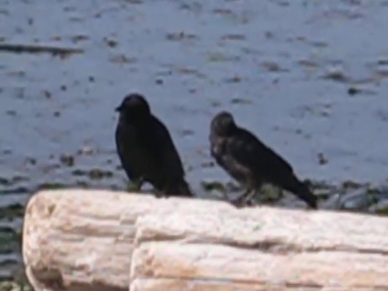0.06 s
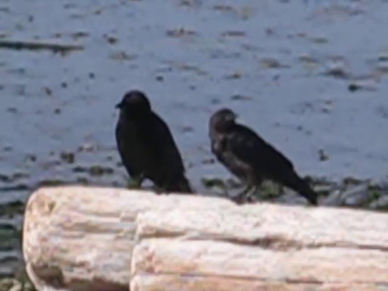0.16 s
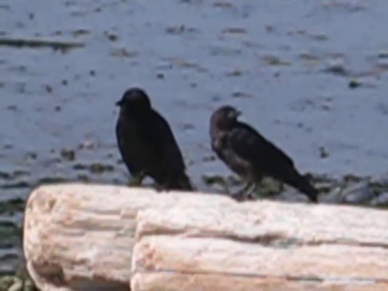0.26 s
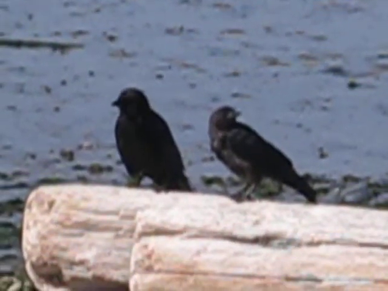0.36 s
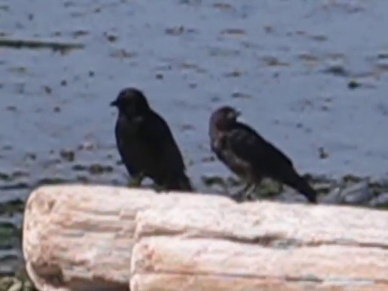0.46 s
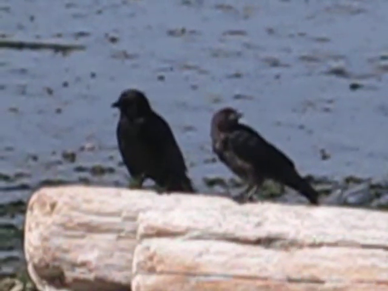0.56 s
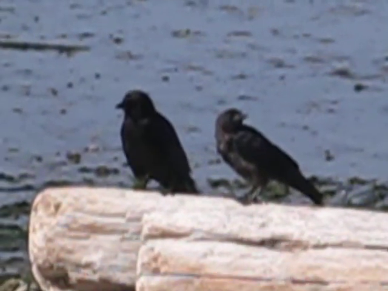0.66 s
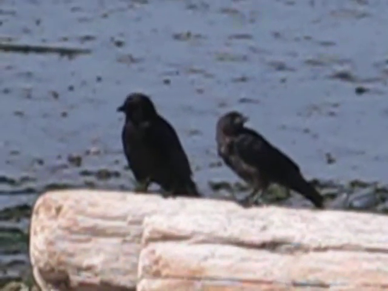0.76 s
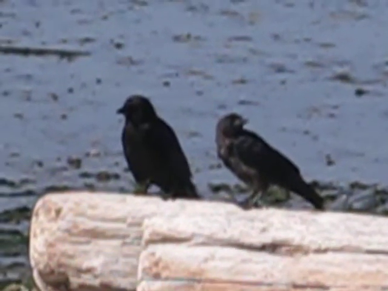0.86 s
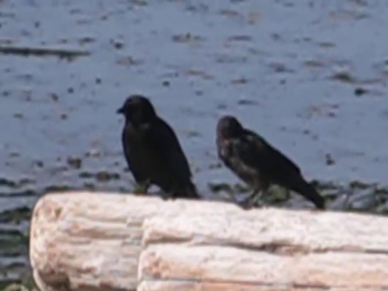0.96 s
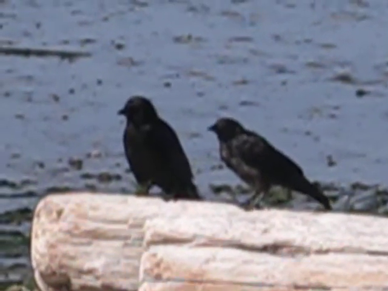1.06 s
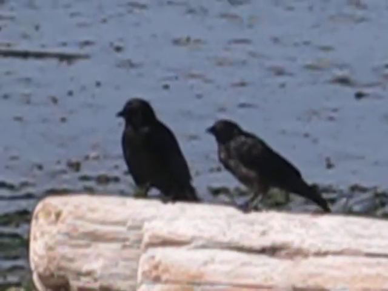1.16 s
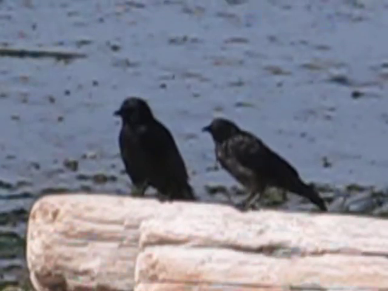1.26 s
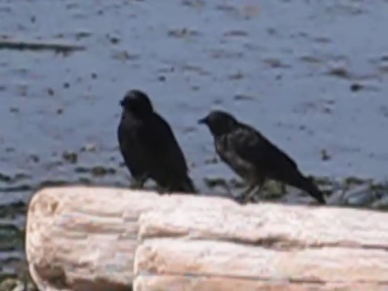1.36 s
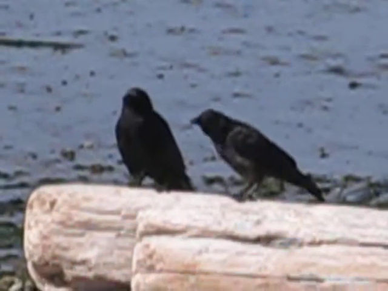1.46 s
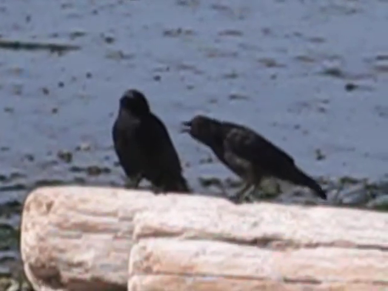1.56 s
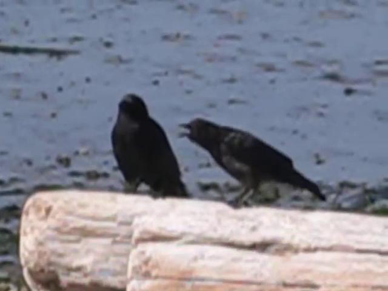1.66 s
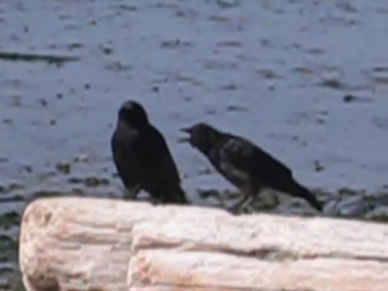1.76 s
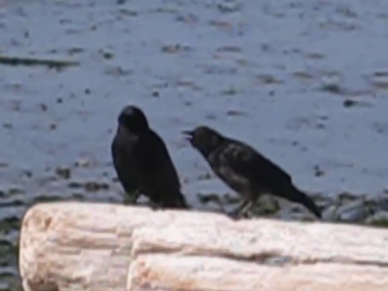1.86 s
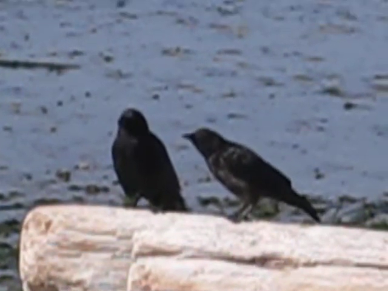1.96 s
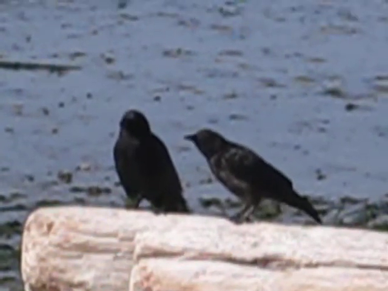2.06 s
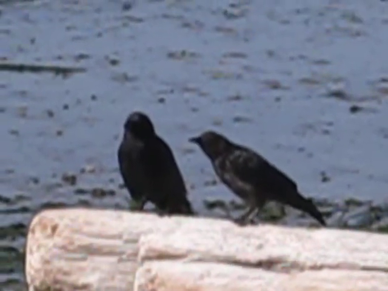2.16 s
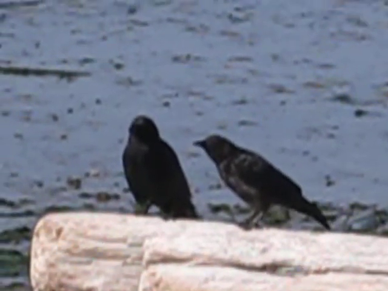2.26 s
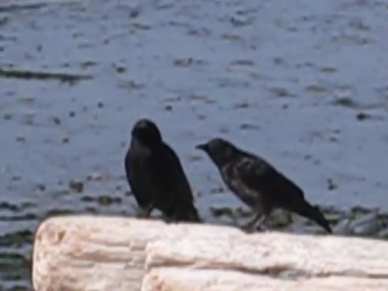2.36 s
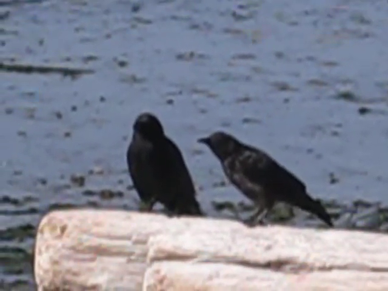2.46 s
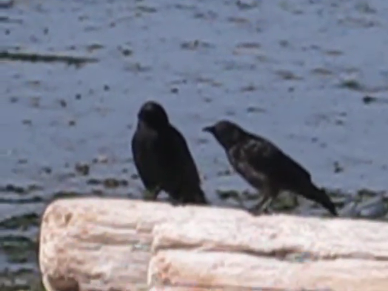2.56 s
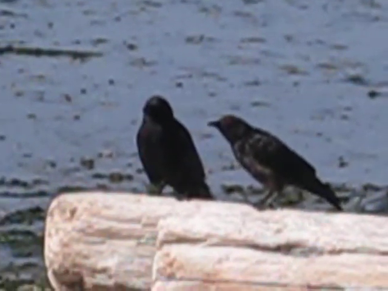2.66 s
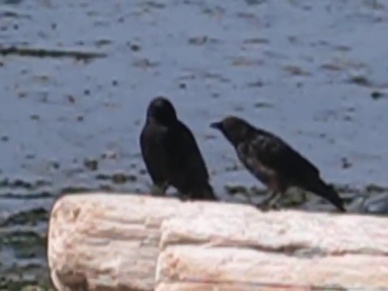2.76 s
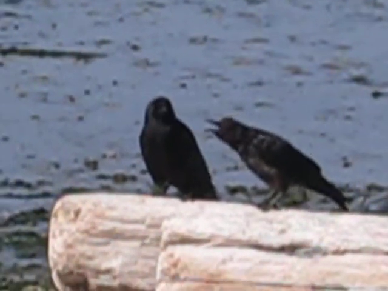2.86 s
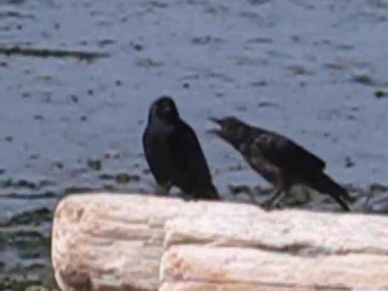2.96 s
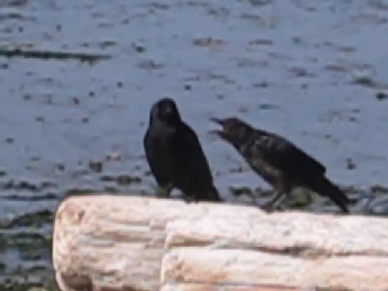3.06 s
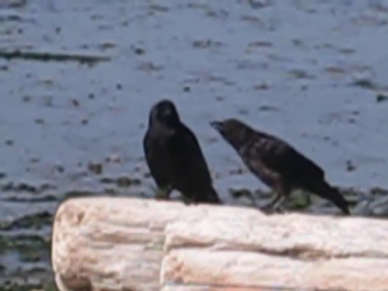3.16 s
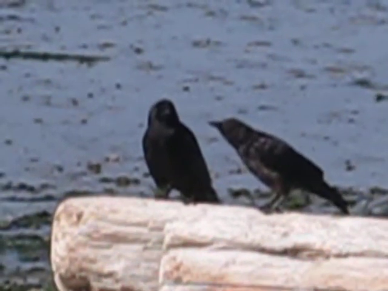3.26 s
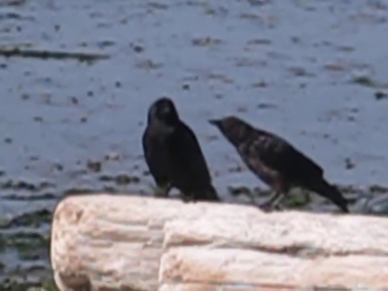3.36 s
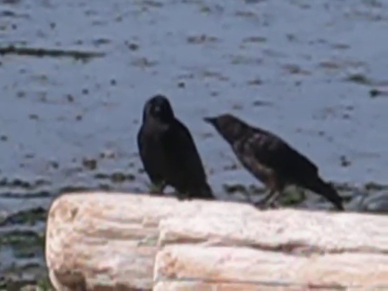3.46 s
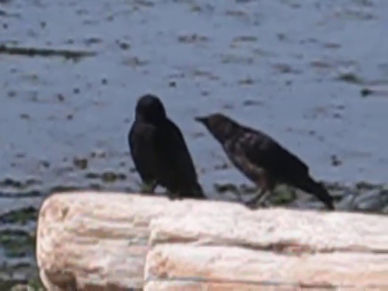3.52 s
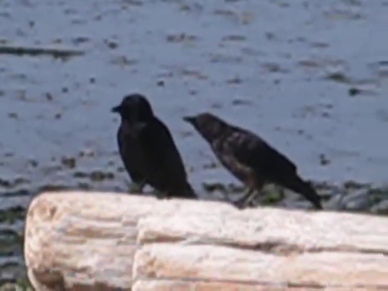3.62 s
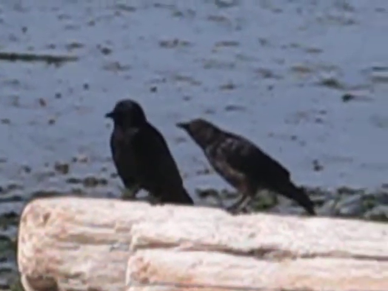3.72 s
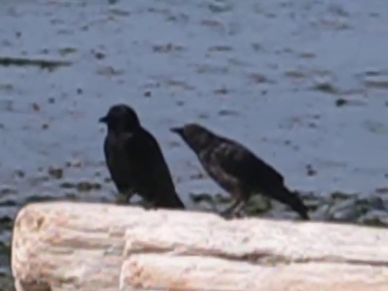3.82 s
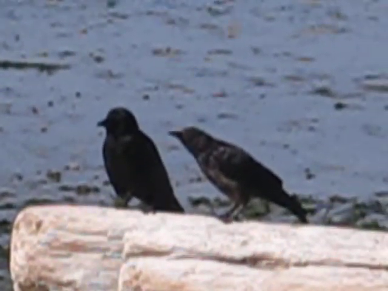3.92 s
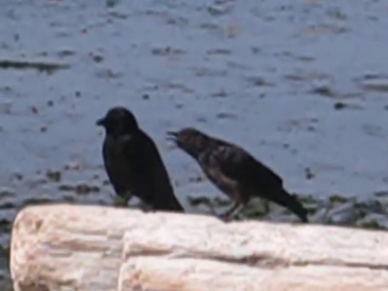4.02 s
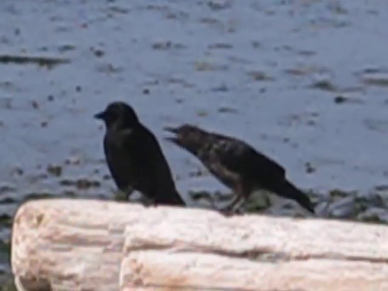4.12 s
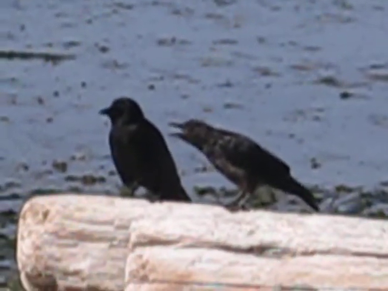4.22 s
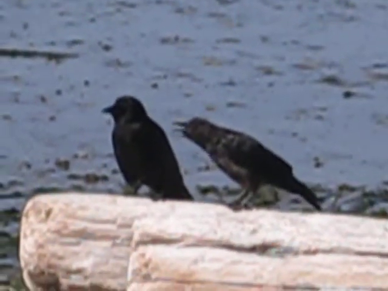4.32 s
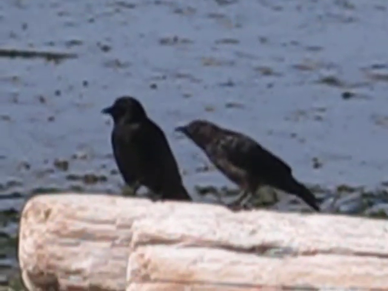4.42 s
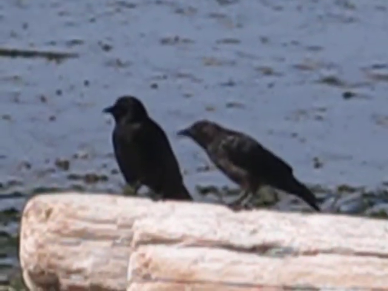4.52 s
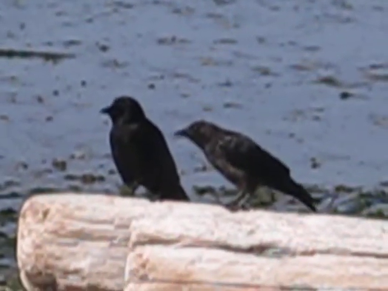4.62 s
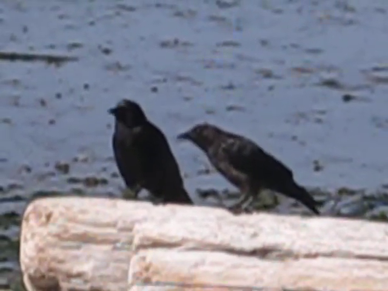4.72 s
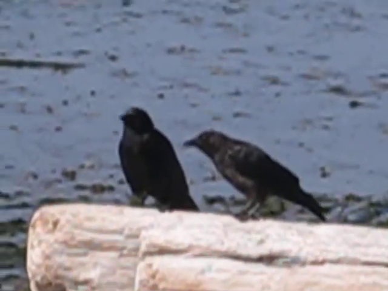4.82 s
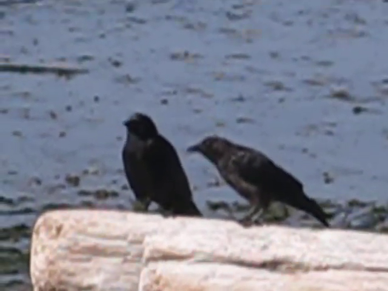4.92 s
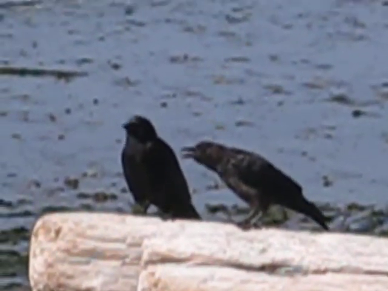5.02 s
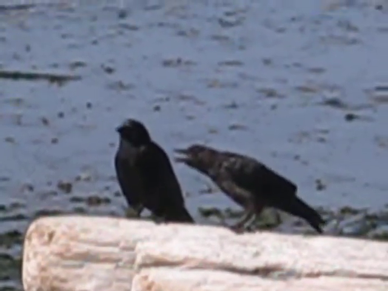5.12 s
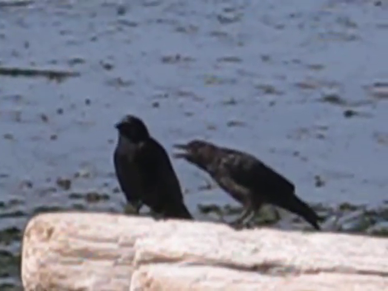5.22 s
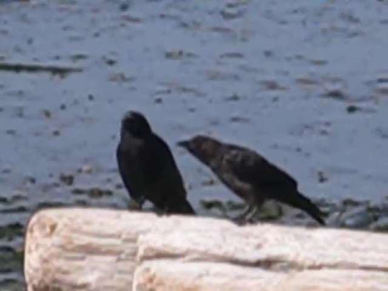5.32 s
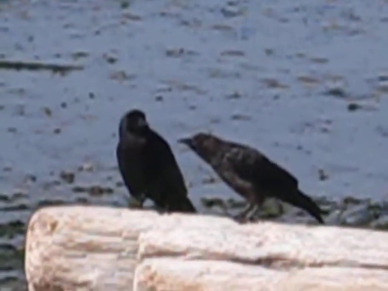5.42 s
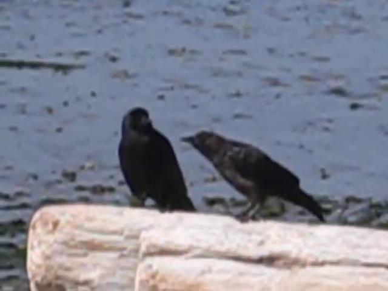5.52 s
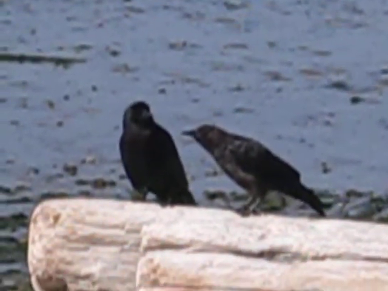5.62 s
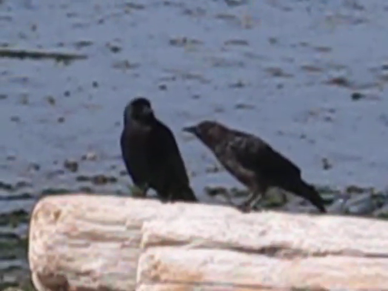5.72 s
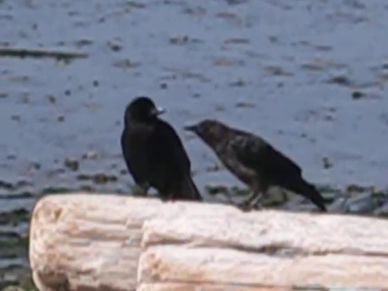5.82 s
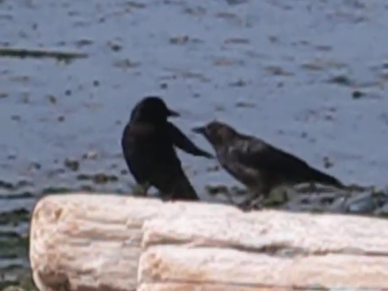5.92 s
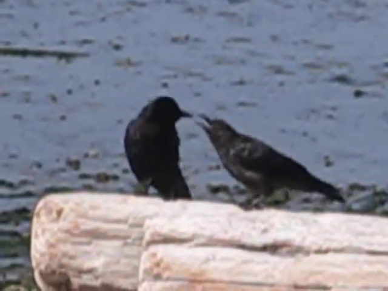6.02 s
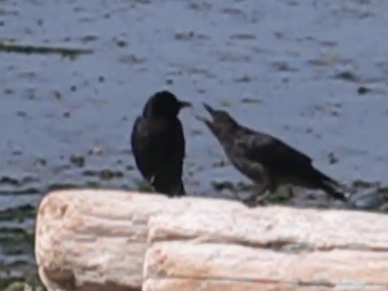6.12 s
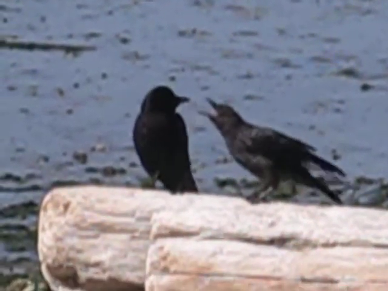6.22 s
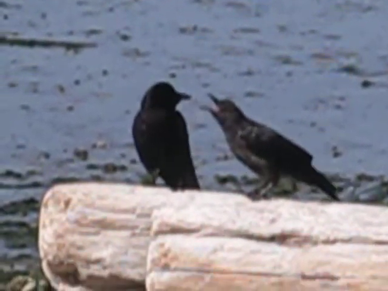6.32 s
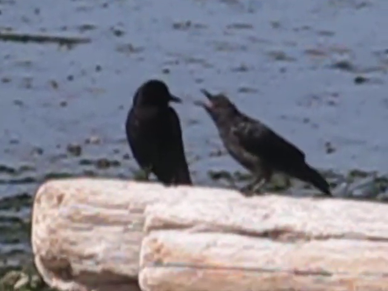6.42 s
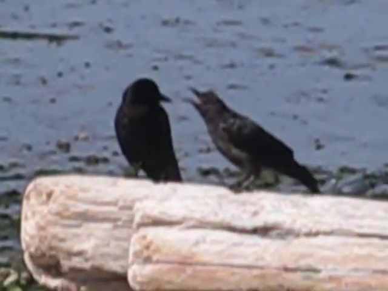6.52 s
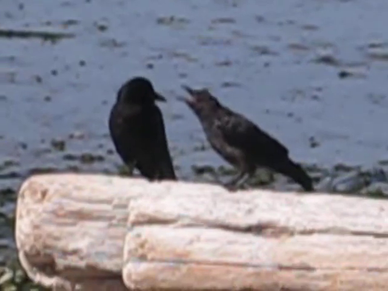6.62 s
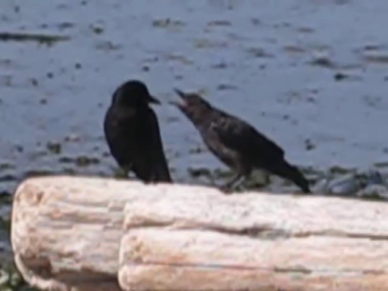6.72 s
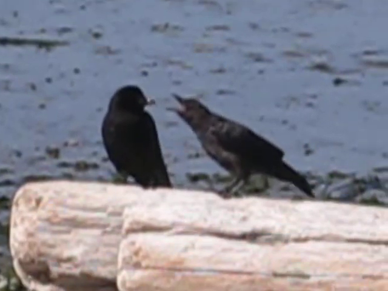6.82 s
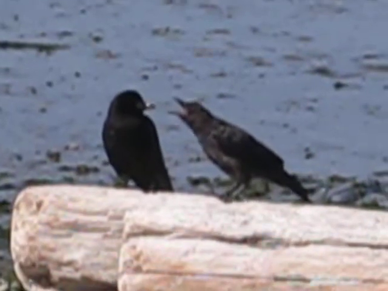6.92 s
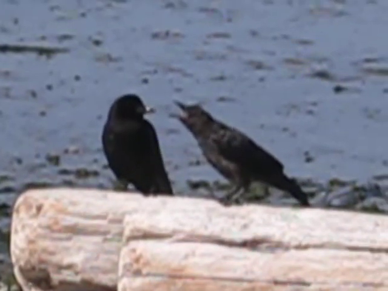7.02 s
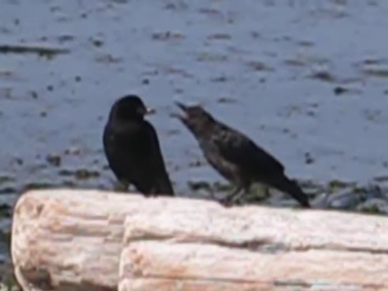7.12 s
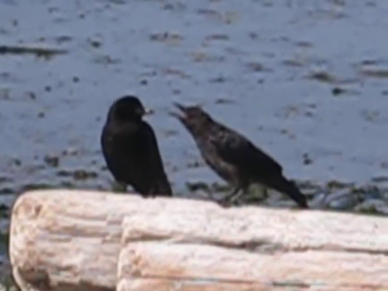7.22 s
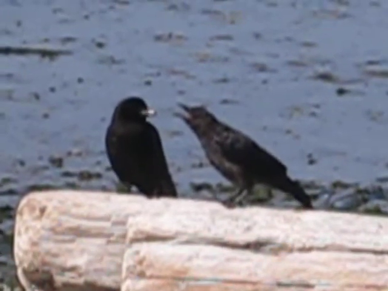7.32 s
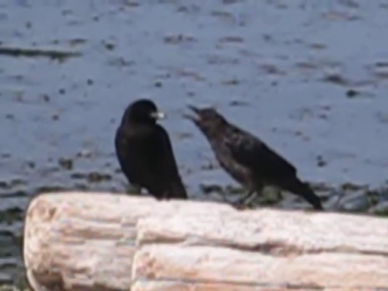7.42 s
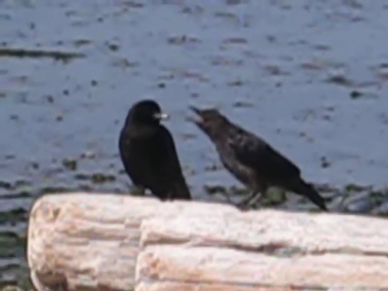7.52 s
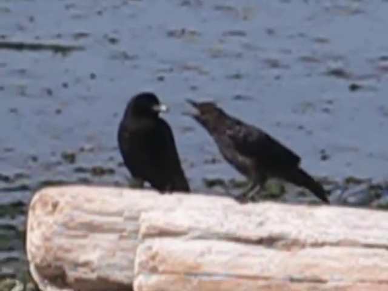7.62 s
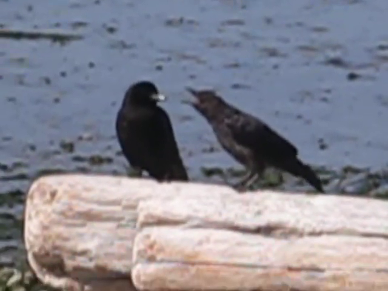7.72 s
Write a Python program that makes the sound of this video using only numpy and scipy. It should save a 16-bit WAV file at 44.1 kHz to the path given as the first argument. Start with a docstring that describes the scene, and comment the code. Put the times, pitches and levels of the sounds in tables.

```python
"""First comes the end of a caw, close by: a young crow begging from a driftwood log on the shore.
Seven more caws follow, and a second, weaker crow overlaps three of them. Each is a train of syrinx
pulses, arched in pitch and rough at both ends, through throat resonances that shift with the bill.
The shore returns a faint tail. Behind lie low rumble and drone, lapping ripples, drips, two thin cries
of a far bird and, late on, a brief hum. All is heard in the centre, as through a single microphone."""
import sys
import numpy as np
from scipy import signal
from scipy.fft import rfft, irfft
from scipy.io import wavfile
from scipy.ndimage import uniform_filter1d

SR = 44100
rng = np.random.default_rng(int(sys.argv[2]) if len(sys.argv) > 2 else 0)


def bounce(signal):
    """Save signal as a 16-bit WAV file at the path given by the first command-line argument."""
    frames = np.transpose(np.atleast_2d(signal))
    limited = np.clip(frames, -1, 1)
    pcm = np.round(limited * 32767).astype(np.int16)
    wavfile.write(sys.argv[1], SR, pcm)


N = 343098
LEAD = SR // 2  # samples of run-up before time zero
EDGE_HZ = 15780  # top of the recorder's band


def gain_of(db):
    """Decibels to amplitude."""
    return 10 ** (np.asarray(db) / 20)


def unit_rms(x):
    """Scales to rms 1."""
    return x / np.sqrt(np.mean(x ** 2) + 1e-20)


def curve_at(points, hz):
    """Interpolates (frequency, value) points on a log-frequency axis."""
    f, value = np.transpose(points)
    return np.interp(np.log(hz + 1), np.log(f + 1), value)


def wander(size, hz):
    """Slow random motion of rms about 1, up to about hz."""
    padded = size + SR // 4
    f = np.fft.rfftfreq(padded, 1 / SR)
    return unit_rms(irfft(rfft(rng.standard_normal(padded)) * np.exp(-(f / hz) ** 2)))[:size]


def add(track, start, sound):
    """Adds a sound at start seconds to a track that begins with the run-up."""
    part = track[LEAD + round(start * SR):][:len(sound)]
    part += sound[:len(part)]


def breath(row, scoop_hz, drop_hz, drop_s, rough_slack):
    """One push of air: the pitch scoops, climbs, sags and drops; the slack ends are rough and harsh."""
    start, length, top_hz, top_s, sag_hz_per_s, level_db, fade_db_per_s, treble_db, rough_held = row
    scoop_s, climb_hz_per_s = .014, 300
    lowest_hz, taut_hz = 222.2, 354.3  # the syrinx roughens as it slackens from taut to its lowest beat
    ends_db, ends_s = 26, 0.017  # the swell in and the dying away
    bite_db, bite_s, harsh_db = 7, 0.025, 0.5  # extra treble at the onset and when slack
    t = np.arange(0, length, 1 / SR)
    left = length - t
    arch = top_hz - np.maximum(climb_hz_per_s * (top_s - t), sag_hz_per_s * (t - top_s))
    pitch = arch - scoop_hz * np.exp(-t / scoop_s) - drop_hz * np.exp(-left / drop_s)
    pitch = np.maximum(pitch, lowest_hz)
    attack_db = 25.5 * np.exp(-t / ends_s)
    release_db = ends_db * np.exp(-left / ends_s)
    loud_db = level_db - fade_db_per_s * t - attack_db - release_db
    slack = np.maximum(taut_hz - pitch, 0) / (taut_hz - lowest_hz)
    rough = np.clip(rough_held + rough_slack * slack ** 1.18, 0, 1)
    treble = gain_of(treble_db + bite_db * np.exp(-t / bite_s) + harsh_db * slack)
    return start, pitch, loud_db, rough, treble


def throat(modes, hz, progress):
    """Gain of steep resonances that glide and change level as the caw's progress goes from 0 to 1."""
    power = 0
    for start_hz, end_hz, width, start_db, end_db in modes:
        detuning = (hz - start_hz - (end_hz - start_hz) * progress) / (width / 2)
        peak = gain_of(start_db + (end_db - start_db) * progress)
        power = power + (peak / (1 + detuning ** 2)) ** 2
    return np.sqrt(power)


def bill(notches, hz):
    """Gain left by the bill's antiresonances."""
    return gain_of(sum(db * np.exp(-((hz - centre) / width) ** 2) for centre, width, db in notches))


def caw(push, modes, notches, jitter, tremor, rasp, air, drift_db, smear_rad, low_cut_hz):
    """Jittery syrinx pulses and pulsed air noise ring the throat."""
    start, pitch, level_db, rough, treble = push
    size = len(pitch)
    t = np.arange(size) / SR
    pitch = uniform_filter1d(pitch, 500, mode="nearest")
    pitch = pitch * (1 + 0.0026 * wander(size, 36.5) + (tremor + jitter * rough) * wander(size, 326))
    turns = np.cumsum(pitch) / SR
    # the throat rings after each pulse, so its phase is causal; paths round the bill spread it further
    grid_hz = np.fft.fftfreq(2048, 1 / SR)
    phase = -signal.hilbert(np.log(throat(modes, abs(grid_hz), 0.37) + 1e-4)).imag
    phase += smear_rad * wander(2048, 1290)
    coarse = np.arange(0, size, 64)
    smooth_pitch = uniform_filter1d(pitch, 300, mode="nearest")[coarse]
    voice = np.zeros(size)
    for harmonic in range(1, 53):
        hz = harmonic * smooth_pitch
        high = np.clip((hz - 2400) / 1600, 0, 1)
        # upper partials swell a little and dip deeply, one by one, as the head moves
        drift = gain_of(drift_db * high * np.minimum(wander(size, 10.3)[coarse] + 0.18, 1))
        radiated = (hz < EDGE_HZ) / (1 + (low_cut_hz / hz) ** 6)  # a small bill radiates little bass
        tract = throat(modes, hz, coarse / size) * bill(notches, hz)
        gain = tract * treble[coarse] ** high * drift * radiated
        ring = gain * np.exp(1j * np.interp(hz, grid_hz[:1024], phase[:1024]))
        voice += (np.interp(np.arange(size), coarse, ring) * np.exp(2j * np.pi * harmonic * turns)).real
    local_power = signal.fftconvolve(voice ** 2, signal.windows.hann(900) / 450, "same")
    voice /= np.sqrt(local_power + 1e-9)
    # air escapes in a puff each cycle
    puffs = rng.standard_normal(size) * (0.65 + np.exp(-(turns % 1) / 0.34))
    f = np.fft.rfftfreq(size, 1 / SR)
    hiss = unit_rms(irfft(rfft(puffs) * throat(modes, f, 1.0) * f / (1 + f / 4000), size))
    sound = voice * (1 + 0.64 * rough * wander(size, 150)) + (air + rasp * rough) * hiss
    fade = np.minimum(t / 0.018, 1) * np.minimum(t[::-1] / .007, 1)
    return start, sound * gain_of(level_db) * fade


# The crow on the log, a row a caw:
# t/s, length/s, top f/Hz, time to top/s, sag/(Hz/s), level/dB, fade/(dB/s), treble/dB, roughness/0-1
BEGGING_CAWS = [(-.27, 0.33, 336, .1, 249, -25.5, 39, -2, 0.04),
                (1.545, 0.35, 376, 0.093, 144.7, -17.5, 8, -2.5, 0),
                (2.848, 0.31, 380.6, 0.1, 165.5, -18, 5.5, -1, 0.04),
                (4.059, .300, 368.5, 0.092, 140.5, -17.5, 4, -2, .012),
                (5.032, .2914, 380.3, 0.091, 243, -18, 6.5, -.5, 0),
                (6.079, 0.3, 394.3, .105, 179.6, -16.5, 9, -0.5, 0.01),
                (6.712, 0.28, 392.5, 0.1, 190, -17.5, 9.5, -1.5, 0.04),
                (7.551, .327, 369.7, 0.11, 192, -17.5, 8, -0.5, 0.01)]
# Its throat resonances in the opening caw: start f/Hz, end f/Hz, width/Hz, start level/dB, end level/dB
OPENING_THROAT = [(1550, 1810, 550, -8, 3), (2130, 2170, 350, 1, -2), (3600, 4200, 1000, -20, -19),
                  (6000, 6000, 2000, -28, -37), (8000, 7500, 800, -28, -28)]
# Its throat in each later caw, columns as OPENING_THROAT
LATER_THROATS = [
    [(710, 650, 620, -23, -45), (1575, 1280, 190, 3, -17.5), (2133, 1920, 290, 1, 7.5),
     (3770, 3760, 1400, -19, -15.5), (5040, 4900, 1600, -25, -21.5), (6340, 6300, 1200, -25.5, -19),
     (8000, 7940, 600, -27, -20.5), (9200, 8900, 3900, -31.5, -29.5)],
    [(730, 550, 380, -28, -23), (1520, 1530, 234, -1.5, -9), (2136, 2004, 330, 0, 6),
     (3510, 3800, 630, -17, -13.5), (4900, 5300, 1700, -25.5, -19), (6230, 6400, 710, -24.5, -20),
     (8100, 7600, 780, -28.5, -22), (9500, 9100, 3396.0, -34, -39)],
    [(700, 470, 170, -29, -18), (1590, 1200, 190, -4, -20.5), (2094, 1950, 370, 1, 3),
     (3680, 3970, 1200, -22.5, -17), (5750, 5640, 760, -19.0, -18.5), (7150, 7160, 660, -29, -21.5),
     (8600, 8200, 1900, -31, -30), (10721.0, 10687.0, 610, -38, -35)],
    [(729.0, 570, 370, -25, -34), (1510, 1560, 210, -3, -18), (2140, 2040, 550, -1, -2.5),
     (3730, 3590, 210, -16.5, -20), (4360, 4230, 620, -22, -17), (6000, 5870, 670, -16, -19),
     (7900, 7700, 580, -25, -27), (9030.0, 8100, 3200, -35, -33.5)],
    [(740, 731.0, 220, -30, -29), (1570, 1540, 300, -5, -8), (2114, 2055, 450, -2, 1.5),
     (3620, 3700, 870, -16.5, -16.5), (5630, 5300, 1600, -29.0, -21), (6660, 7000, 1000, -34, -23),
     (8403.0, 8100, 1300, -33, -29), (10114.0, 10163.0, 2300, -42.5, -36.5)],
    [(733.0, 780, 320, -28, -29), (1560, 1530, 220, -3.5, -7), (2170, 2050, 407.0, -3.5, 3),
     (3580, 3860, 960, -17, -13), (5100, 5500, 776.0, -29, -17.5), (6197.0, 7400, 1800, -26, -27.5),
     (8138.0, 8640, 470, -26, -28), (9700, 9907.0, 2600, -39, -37)],
    [(727.0, 729.0, 350, -28, -34), (1470, 1720, 330, -7, -0.5), (2040, 2160, 335, 3.5, -1.5),
     (3636.0, 3600, 1100, -16, -17.5), (5664.0, 5700, 1170, -21.5, -21), (7100, 7230.0, 948.0, -31, -30),
     (8605.0, 8500, 1240, -28.5, -29.5), (10003.0, 11000, 2700, -46, -43)],
]
# Its bill's antiresonances, a pair a caw (the first two caws share one): f/Hz, width/Hz, gain/dB
BILL_NOTCHES = [
    [(1932, 99, -9), (4120, 290, -7.5)],
    [(1900, 100, -4.5), (4100, 190, -7)],
    [(1890, 160, -6), (4730, 190, -9)],
    [(1870, 43, -5), (5100, 180, -14)],
    [(1940, 65, -3.5), (4380, 220, -6)],
    [(1960, 110, -5), (4330, 230, -8)],
    [(1830, 180, 0), (4740, 200, -2)],
]


def begging_crow(track):
    """The young crow on its log, nearest the microphone, already calling at time zero."""
    throats = [OPENING_THROAT] + LATER_THROATS
    for row, modes, notches in zip(BEGGING_CAWS, throats, BILL_NOTCHES[:1] + BILL_NOTCHES):
        push = breath(row, scoop_hz=299.9, drop_hz=184.4, drop_s=.0225, rough_slack=0.585)
        add(track, *caw(push, modes, notches, jitter=0.087, tremor=0.0019, rasp=0.96, air=0.023,
                        drift_db=5.5, smear_rad=1.77, low_cut_hz=450))


# The tail from the far bank: f/Hz, time to fall 60 dB/s
BANK_DECAY = [(300, 1), (2000, 0.77), (5000, 0.91), (12000, 1)]


def shore_echo(calls, tail_db, scatter_db, scatter_s):
    """Near logs and stones scatter briefly; the far bank leaves a faint, dull tail."""
    t = np.arange(SR) / SR
    reflections = rng.standard_normal(SR) * (rng.random(SR) < 2500 / SR)
    hz, frame_s, bands = signal.stft(reflections, SR, nperseg=256)
    decay = gain_of(-60 * frame_s / curve_at(BANK_DECAY, hz)[:, None])
    bands = bands * decay / (1 + (hz[:, None] / 7000) ** 2)
    tail = signal.istft(bands, SR, nperseg=256)[1][:SR] * (1 - np.exp(-t / 0.03))
    near = rng.standard_normal(SR) * (rng.random(SR) < 1500 / SR) * np.exp(-t / scatter_s) * (t > .002)
    response = gain_of(tail_db) * tail / np.linalg.norm(tail)
    response += gain_of(scatter_db) * near / np.linalg.norm(near)
    return signal.fftconvolve(calls, response)[:len(calls)]


def noise_bed(spectrum, patchy_db, frame):
    """Coloured noise of rms 1 with drifting patches."""
    hz = np.fft.rfftfreq(frame, 1 / SR)
    hop = frame // 4
    real, imag, patches = rng.standard_normal((3, N // hop + 5, len(hz)))
    patches = unit_rms(uniform_filter1d(uniform_filter1d(patches, size=10, axis=0), size=9, axis=1))
    bands = (real + 1j * imag) * gain_of(curve_at(spectrum, hz) + patchy_db * patches)
    return unit_rms(signal.istft(bands.T, nperseg=frame, noverlap=frame - hop)[1][:N])


# The wash at the waterline, behind the crows: f/Hz, relative level/dB
WASH_SPECTRUM = [(350, -19), (600, 1), (891, -3.5), (1340, -1), (1500, -2.5), (1990, -2), (2160, -2.5),
                 (2760, -3.5), (3480, -8.5), (3880, -8), (7470, -19), (14200, -27.5), (15600, -31)]


def ripples(level_db, crest_s, period_s, depth_db):
    """Ripples run up the shore in slow, regular sets."""
    t = np.arange(N) / SR
    lull_db = depth_db * np.sin(np.pi * (t - crest_s) / period_s) ** 2
    return gain_of(level_db - lull_db) * noise_bed(WASH_SPECTRUM, patchy_db=2.0, frame=512)


# Rumble from far off: f/Hz, relative level/dB
RUMBLE_SPECTRUM = [(15, -32), (30, -4), (42, 1), (56, 2), (80, 0.5), (125, -5.5), (173, -12), (270, -13.5),
                   (340, -17.5), (440, -19), (540, -21), (700, -39), (910, -51), (1540, -100)]
# The steady tones within it: f/Hz, level/dB
DRONE_TONES = [(44, -57), (380, -63.5)]


def far_rumble(level_db):
    """Low noise in the distance, with a drone of two slightly wavering tones."""
    sound = gain_of(level_db) * noise_bed(RUMBLE_SPECTRUM, patchy_db=0.67, frame=4096)
    for hz, db in DRONE_TONES:
        turns = np.cumsum(hz + 3 * wander(N, 5.74)) / SR
        sound += gain_of(db) * unit_rms(np.sin(2 * np.pi * turns))
    return sound


# Small drips and ticks at the waterline: t/s, f/Hz, level/dB, decay/s, bandwidth/fraction of f
DRIPS = [(.53, 4900, -52, 0.0084, .1), (.745, 3550, -51, .012, .05), (1.43, 10500, -58, .004, 0.14),
         (4.6, 590, -43, 0.022, 0.048), (4.625, 683, -44, 0.012, 0.034), (5.65, 9900, -57, 0.0035, 0.19),
         (6.505, 5170, -46, 0.0068, 0.1), (6.509, 8200, -60, .004, 0.18)]


def drips(track):
    """Each drip is a short burst that rings in one narrow band."""
    size = 4096
    t = np.arange(size) / SR
    f = np.fft.rfftfreq(size, 1 / SR)
    for start, hz, level_db, decay_s, spread in DRIPS:
        band = np.exp(-((f / hz - 1) / spread) ** 2)
        ring = unit_rms(irfft(rfft(rng.standard_normal(size)) * band))
        envelope = np.exp(-t / decay_s) * (1 - np.exp(-t * hz / 2))
        add(track, start, gain_of(level_db) * ring * envelope)


def far_tone(row, sag_hz_per_s, fade_db_per_s, waver, waver_hz, scoop_hz=0, scoop_s=1):
    """A distant tone that may scoop up, then sinks and fades, blurred by its path."""
    start, length, aim_hz, level_db = row
    t = np.arange(0, length, 1 / SR)
    hz = aim_hz - sag_hz_per_s * t - scoop_hz * np.exp(-t / scoop_s)
    turns = np.cumsum(hz * (1 + waver * wander(len(t), waver_hz))) / SR
    tone = np.sin(2 * np.pi * turns) * (1 + 0.11 * wander(len(t), 25))
    envelope = gain_of(level_db - fade_db_per_s * t) * signal.windows.tukey(len(t), .2)
    return start, unit_rms(tone) * envelope


# A bird far from the microphone: t/s, length/s, aimed f/Hz, level/dB
FAR_CRIES = [(0.998, 0.31, 1740, -57.5), (2.26, 0.37, 1730, -54.5)]


def far_bird(track):
    """Two thin cries, each a quick rise and a longer fall."""
    for row in FAR_CRIES:
        add(track, *far_tone(row, sag_hz_per_s=780, fade_db_per_s=5, waver=0.0305, waver_hz=150,
                             scoop_hz=254.6, scoop_s=0.043))


# The second crow, weaker at the microphone, columns as BEGGING_CAWS
SECOND_CAWS = [(2.965, 0.36, 374.2, 0.071, 195, -26, 24.2, -1.1, 0.093),
               (4.02, 0.3, 359.5, 0.048, 520, -28.5, 48.3, -1, 0.075),
               (6.568, .332, 367.7, .072, 232, -22.5, 48, -1, .055)]
# Its throat in each caw, columns as OPENING_THROAT
SECOND_THROATS = [
    [(730, 560, 150, -16.5, -11), (1530, 1050, 220, -1, -6), (2200, 1695, 285, -2.5, 4.5),
     (2980, 2400, 580, -15, -4.5), (4500, 4300, 910, -18, -16), (6740, 6700, 3000, -21, -17),
     (8600, 8400, 1500, -22.5, -23), (11000, 11000, 3000, -32, -34)],
    [(700, 420, 180, -3, -15), (1360, 1200, 310, 2.5, -9), (1970, 1630, 400, 3.5, -0.5),
     (2720, 2650, 190, -9, -8), (4300, 3000, 800, -25, -18), (6700, 6700, 2900, -29, -22),
     (10000, 10000, 3500, -40, -38)],
    [(686, 580, 200, -12.5, -11), (1500, 1260, 370, 1.5, -22), (2155, 1700, 290, 4, 0),
     (2930, 2600, 210, -29, 2), (3690, 3500, 620, -20, -16), (4310, 3600, 410, -16.5, -14),
     (6700, 6300, 3200, -19.5, -17.5), (10000, 14000, 5100, -38, -38)],
]
# Its bill's antiresonances in all three caws: f/Hz, width/Hz, gain/dB
SECOND_NOTCHES = [(946, 195, -9.5), (5300, 210, -6)]


def second_crow(track):
    """Three breathier, fast-fading caws that overlap the begging crow's."""
    for row, modes in zip(SECOND_CAWS, SECOND_THROATS):
        push = breath(row, scoop_hz=170.2, drop_hz=77.9, drop_s=.06, rough_slack=0.27)
        add(track, *caw(push, modes, SECOND_NOTCHES, jitter=0.055, tremor=0.0026, rasp=1.0, air=0.099,
                        drift_db=7, smear_rad=2.23, low_cut_hz=260))


# A hum in the distance: t/s, length/s, f/Hz, level/dB
FAR_HUM = (7.02, .73, 260, -50)


def far_hum(track):
    """One low tone that comes and goes, sinking slightly."""
    add(track, *far_tone(FAR_HUM, sag_hz_per_s=12.7, fade_db_per_s=14, waver=0.0072, waver_hz=14))


def scene():
    """From one spot on the shore: crows and their echo in front, water and far sounds behind, in mono."""
    crows, behind = np.zeros((2, LEAD + N))
    begging_crow(crows)
    second_crow(crows)
    far_bird(behind)
    far_hum(behind)
    drips(behind)
    echo = shore_echo(crows, tail_db=-25.5, scatter_db=-18, scatter_s=0.0062)
    mono = (crows + echo + behind)[LEAD:]
    mono += ripples(level_db=-49, crest_s=0.29, period_s=2.22, depth_db=2)
    mono += far_rumble(level_db=-42)
    return np.array([mono, mono])


def record(dry):
    """The recorder behind the microphone cuts off the highest treble."""
    low_pass = signal.firwin(511, EDGE_HZ, window=("kaiser", 9), fs=SR)
    return signal.oaconvolve(dry, low_pass[None], "same")


dry = scene()
out = record(dry)
bounce(out)
```